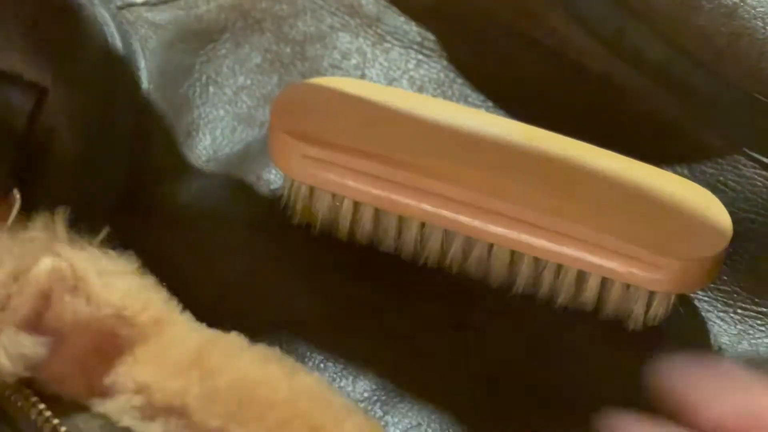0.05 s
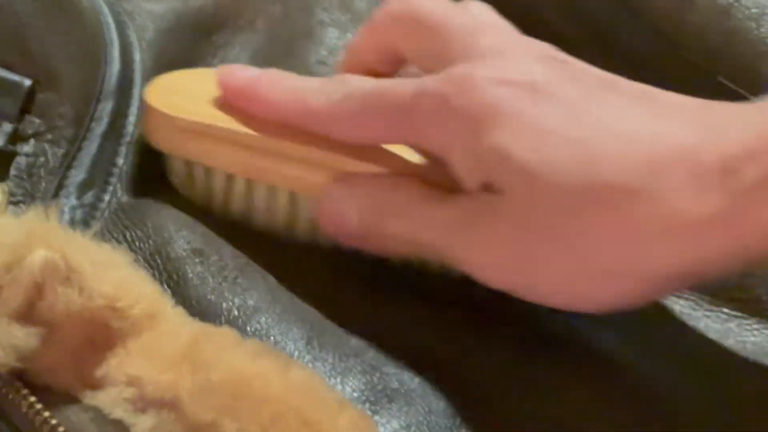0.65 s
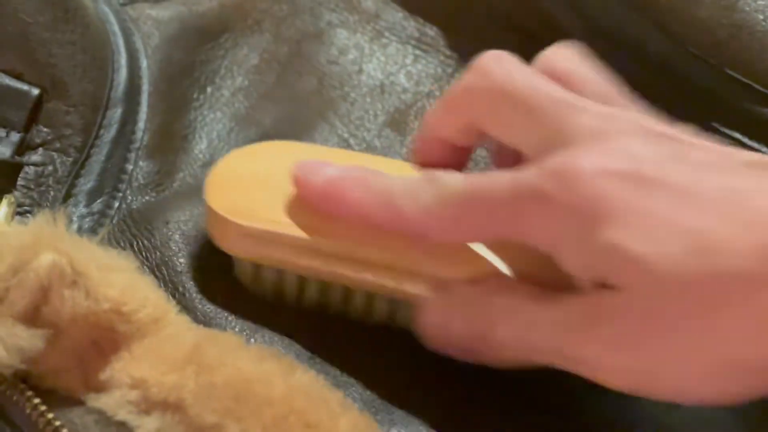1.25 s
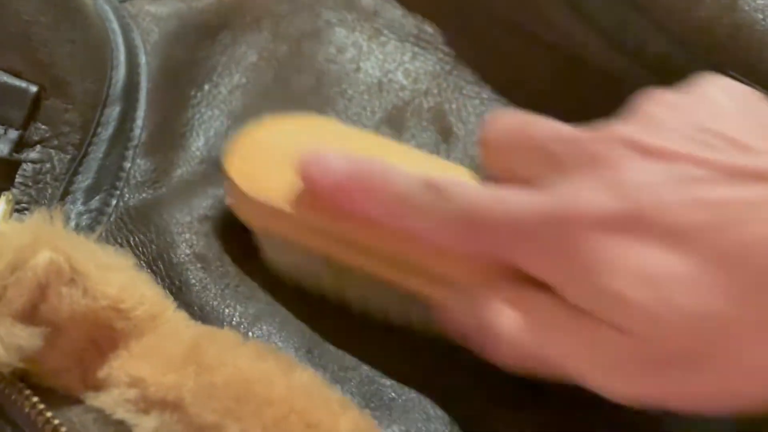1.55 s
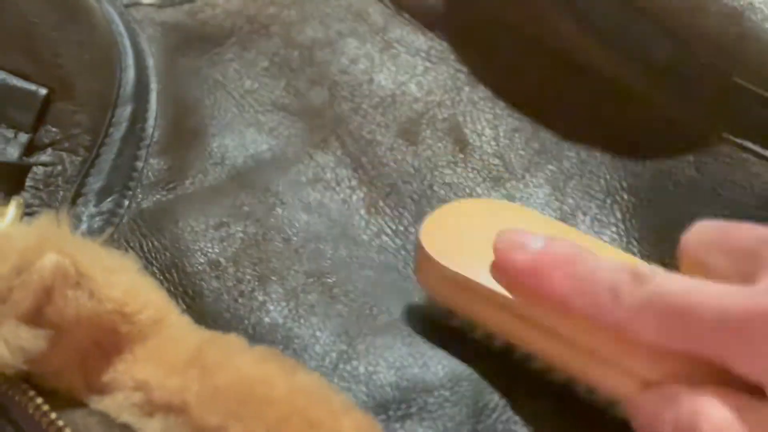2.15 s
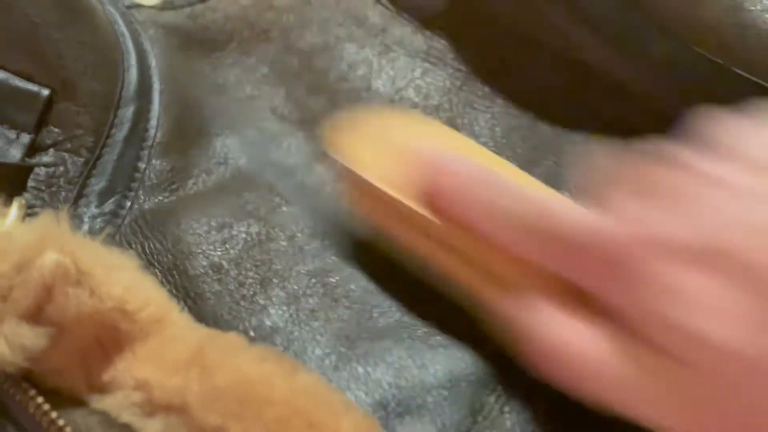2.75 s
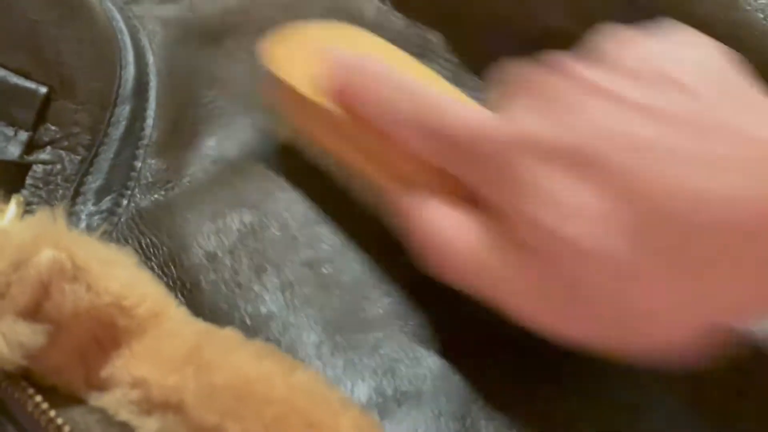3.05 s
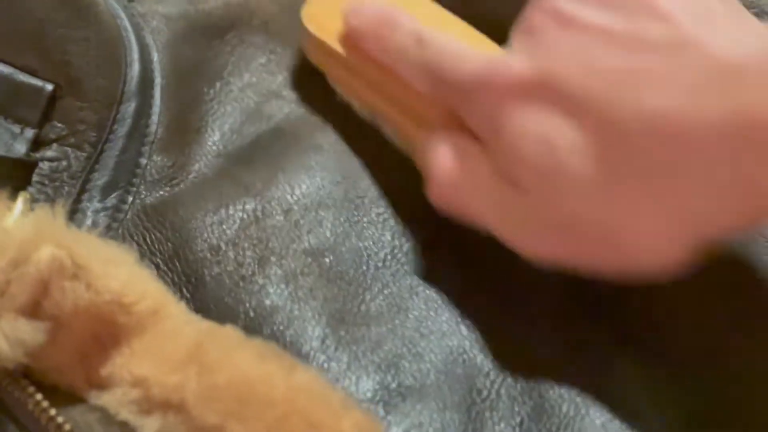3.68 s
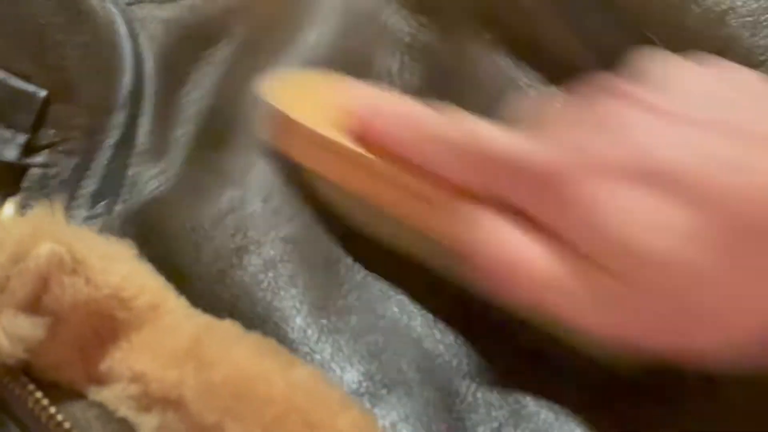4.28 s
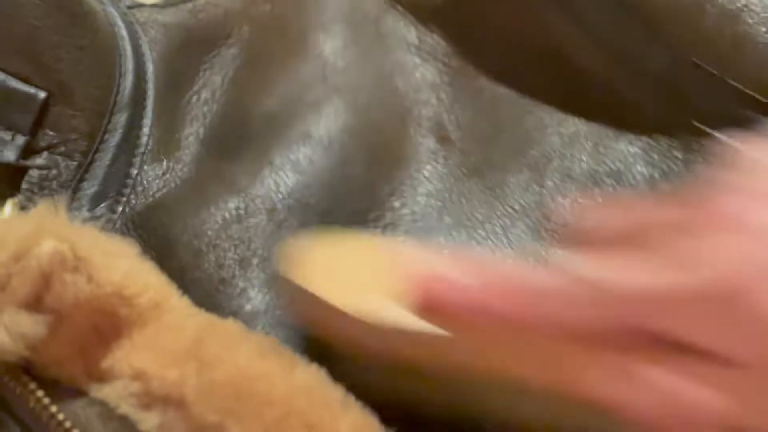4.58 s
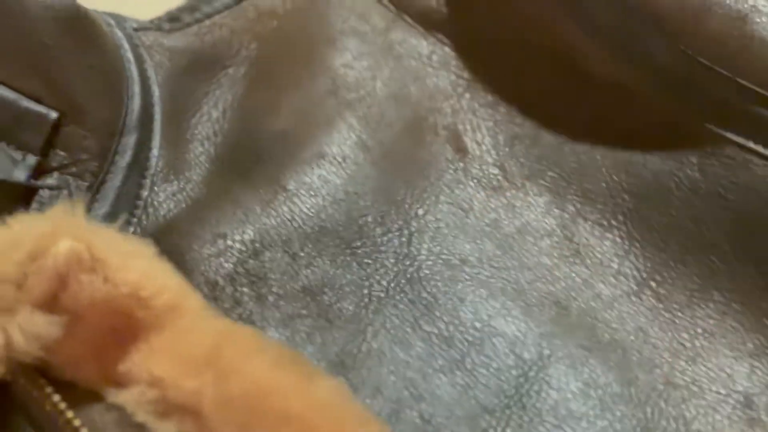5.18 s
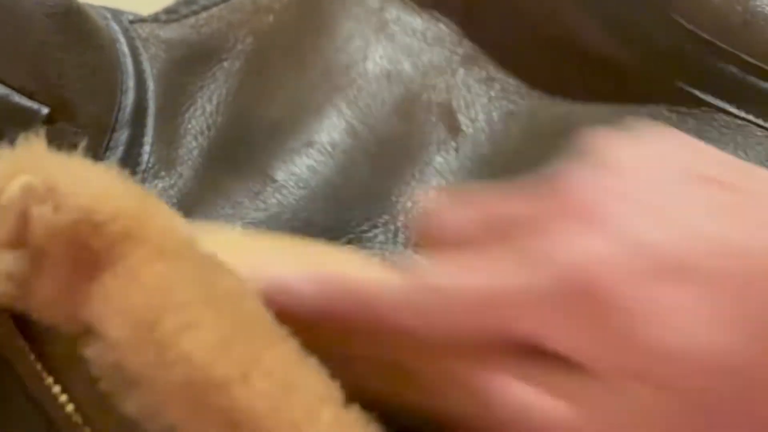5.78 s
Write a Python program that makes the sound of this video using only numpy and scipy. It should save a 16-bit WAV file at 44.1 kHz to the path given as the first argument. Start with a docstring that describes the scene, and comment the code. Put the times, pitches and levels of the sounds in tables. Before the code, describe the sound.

A wooden bristle brush scrubs a padded leather jacket, close to the microphone in a quiet room. After faint handling ticks come a few light, slower strokes, which soon grow louder and settle into a fast, even back and forth. Each stroke is a dry rasp with a fine hiss and a leathery rustle. In the first half the brush catches several times, making soft, low, stuttering thuds.

```python
"""Brushing a leather jacket

A wooden bristle brush scrubs to and fro, close by, in a quiet room. Each stroke speeds up and stops:
the leather rustles, its padding rumbles, the handle rings, the bristles rasp over the grain and
their tips hiss. In the first half the brush catches and judders, thudding on the padded jacket."""
import sys
import numpy as np
from scipy import signal
from scipy.fft import rfft, irfft, next_fast_len
from scipy.io import wavfile
from scipy.ndimage import uniform_filter1d, map_coordinates

SR = 44100
rng = np.random.default_rng(int(sys.argv[2]) if len(sys.argv) > 2 else 0)


def wrap_up_sound(samples):
    """Save the sound to the file named by the first command line argument, as 16-bit audio."""
    columns = np.atleast_2d(samples).T
    # keep every value between -1 and 1, then stretch to whole-number steps
    tamed = np.clip(columns, -1, 1)
    steps = np.round(tamed * 32767).astype(np.int16)
    wavfile.write(sys.argv[1], SR, steps)


N = 261513

# Noise spectra. Each row: frequency in Hz, relative spectral density in dB.
ROOM_SPECTRUM = [(20, -34), (31, -15), (44, 0), (75, -8), (130, -1.5), (300, -11.5), (1000, -30.5),
                 (3000, -40), (16000, -51)]
PADDING_SPECTRUM = [(25, -28), (50, -4.5), (100, -1.5), (132, 3), (165, -3.5), (215, 1), (320, -7),
                    (700, -38), (2000, -60)]
HANDLE_SPECTRUM = [(2800, -35), (3400, -17), (3630, 2), (3720, -3.5), (3950, -15), (4600, -49)]
LEATHER_SPECTRUM = [(20, -43), (90, -25), (150, -6), (250, 0.5), (380, -3), (540, -1), (700, -3), (820, -5),
                    (940, -5), (1300, -7), (2200, -18.5), (6000, -37)]
HISS_SPECTRUM = [(2000, -19.5), (5400, -13), (6350, -5.5), (7200, -8), (8500, -7.5), (10300, -10),
                 (11800, 1.8), (13200, -0.5), (14300, -4), (15800, -4.5)]
RASP_SPECTRUM = [(300, -33), (800, -11), (1400, 2), (2000, 1), (2800, 0), (3400, -3), (3950, -7),
                 (4400, -8.5), (5500, -12), (6400, -12), (9000, -13), (16000, -8)]
# Stereo width: how alike left and right sound. Each row: frequency in Hz, coherence.
STEREO_COHERENCE = [(60, 0.95), (150, 0.98), (400, .94), (650, 0.77), (1000, 0.83), (1800, 1), (2400, 1),
                    (2900, 1), (3600, 0.88), (4200, 1), (4700, 1), (7400, 1), (8300, 0.88), (9400, 1),
                    (10500, 1), (11200, 0.88), (13400, 1), (15000, 0.87)]
# Each row: frequency in Hz, left phase lead in radians.
STEREO_LEAD_RAD = [(400, 0), (700, .55), (1100, -.2), (2000, 0), (3600, .4), (4400, 0), (7400, 0),
                   (8700, -1.2), (9200, -3.1), (10600, -3.17), (11200, -4.2), (13300, -6.2), (14300, -6.7),
                   (15800, -8.5)]
# Each row: frequency in Hz, left minus right in dB.
STEREO_TILT_DB = [(150, 0), (330, -1), (520, -3), (690, 0), (870, 5), (1080, 0.8), (1250, -1.5), (1700, 0)]
# Hand and bristle ticks. Each row: start in seconds, level in dB, centre in Hz, width in Hz,
# T60 in seconds.
TICKS = [(.022, -61, 4470, 4000, 0.036), (0.081, -59, 800, 700, 0.026), (0.291, -69, 3650, 600, 0.037),
         (2.513, -41.5, 1500, 1499, .035), (2.876, -41, 1390, 1400, 0.044), (4.142, -38, 701, 600, 0.023),
         (5.779, -44, 900, 900, 0.051)]
# Runs of soft blows. Each row: start in seconds, relative level in dB, pitch in Hz,
# blow spacing in seconds, length in seconds.
JUDDERS = [(.378, -34.5, 127.6, 0.021, .12), (1.149, -33, 98, 0.035, .12), (1.359, -28, 133, 0.022, .12),
           (2.109, -27.5, 135, .0215, .12), (2.468, -27.5, 138, .021, .115), (2.699, -27, 102, .027, .07),
           (2.811, -36, 160, .013, .02)]
# Push and pull by turns. Each row: start in seconds, relative level at full speed in dB.
STROKES = [(0.071, -62.5), (0.217, -84), (0.312, -55), (0.401, -45), (0.643, -43.5), (0.913, -44),
           (1.187, -50.5), (1.455, -40.5), (1.679, -39), (1.847, -37), (2.011, -38), (2.174, -36.5),
           (2.324, -38), (2.493, -37.5), (2.67, -37.5), (2.859, -37.5), (3.028, -36.5), (3.204, -38.5),
           (3.367, -37), (3.534, -37.5), (3.695, -36.5), (3.862, -38), (4.023, -34.5), (4.192, -36),
           (4.365, -37), (4.54, -38), (4.701, -37), (4.883, -38), (5.062, -37.5), (5.234, -37),
           (5.414, -38.5), (5.576, -37.5), (5.758, -37)]
# Uneven grip. Each row: time in seconds, lean of the speed peak (+ early, - late).
GRIP_LEAN = [(.31, 0.28), (.4, -.75), (.65, 0.046), (.92, -.25), (1.2, -.9), (1.46, -.8), (1.7, -.2),
             (2.2, 0), (5.6, 0.13)]
# Spot under the brush. Each row: time in seconds, nasal resonance gain in dB, padding share in dB,
# leather tautness in dB (+ taut, - slack).
SPOT_COLOUR = [(.5, -4, -15, 3), (1.05, 1.5, -10, 2.5), (1.5, -5, -9.5, 1), (1.9, -5, -11.5, 2.5),
               (2.4, -1.5, -18.5, 1), (3.2, 0, -17, .5), (3.9, 2.5, -22, 1), (4.6, 2.5, -23.5, -0.5),
               (5.2, 1, -20.5, -2), (5.9, 0.5, -15, -0.5)]
# Bristle tips. Each row: time in seconds, hiss share in dB.
HISS_SHARE_DB = [(.3, -1.5), (.52, -9.5), (.78, -5.5), (1.35, -5.5), (1.57, -14), (1.76, -6.5), (2, -8.5),
                 (3.3, -8), (3.6, -12.5), (4.08, -11.5), (4.4, -6), (5.1, -2.5), (5.9, -3.2)]

STROKE_END_S, USUAL_STROKE_S, USUAL_LEVEL_DB = 5.973, .17, -38
TIME_S = np.arange(N) / SR


def amp(db):
    """Decibels to gain."""
    return 10 ** (np.asarray(db) / 20)


def unit(x):
    """Scale to rms 1."""
    return x / np.sqrt(np.mean(x ** 2) + 1e-20)


def along(points, hz):
    """Read (Hz, value) rows on a log axis."""
    knots_hz, values = np.transpose(points)
    return np.interp(np.log(hz + 1), np.log(knots_hz + 1), values)


def wobble(rate_hz):
    """Smooth random curve."""
    knots = rng.standard_normal(int(N * rate_hz / SR) + 4)
    return map_coordinates(knots, [TIME_S * rate_hz])


def filtered(x, response):
    """Apply a frequency response."""
    size = next_fast_len(N + SR // 4)
    return irfft(rfft(x, size) * response(np.fft.rfftfreq(size, 1 / SR)), size)[..., :N]


def resonance(hz, centre_hz, width_hz):
    """Response of one damped mode."""
    return 1j * hz * width_hz / (centre_hz ** 2 - hz ** 2 + 1j * hz * width_hz)


def boosted(x, db, centre_hz, width_hz):
    """Time-varying boost or cut of one resonance."""
    return x + (amp(db) - 1) * filtered(x, lambda hz: resonance(hz, centre_hz, width_hz))


def stereo(pair, spectrum):
    """Colour two independent signals and mix to left and right, rms 1."""
    size = next_fast_len(N + SR // 16)
    hz = np.fft.rfftfreq(size, 1 / SR)
    coherence = np.clip(along(STEREO_COHERENCE, hz), -1, 1)
    coloured = rfft(pair, size) * amp(along(spectrum, hz))
    common, apart = coloured * np.sqrt([1 + coherence, 1 - coherence])
    return unit(irfft([common + apart, common - apart], size)[:, :N])


def room(level_db=-59):
    """Steady low rumble."""
    return amp(level_db) * stereo(rng.standard_normal((2, N)), ROOM_SPECTRUM)


def walls(x, t60_s=0.11, wet_db=-17):
    """Faint diffuse reflections, different left and right."""
    t = np.arange(SR // 3) / SR
    tail = rng.standard_normal((2, len(t))) * amp(-60 * t / t60_s)
    return amp(wet_db) * signal.fftconvolve(x[None], tail / np.linalg.norm(tail[0]), axes=1)[:, :N]


def ticks(attack_s=0.0004):
    """Hand and catching bristles: short noise puffs, one resonance each."""
    out, t = np.zeros(N + SR), np.arange(SR // 10) / SR
    hz = np.fft.rfftfreq(len(t), 1 / SR)
    for start_s, db, centre_hz, width_hz, t60_s in TICKS:
        spectrum = rfft(rng.standard_normal(len(t))) * resonance(hz, centre_hz, width_hz) ** 2
        envelope = amp(db - 60 * t / t60_s) * (1 - np.exp(-t / attack_s))
        out[round(start_s * SR):][:len(t)] += unit(irfft(spectrum, len(t))) * envelope
    return out[:N]


def judder_blows(touch_db=-3, touch_ratio=1.35, fade_db_per_s=89):
    """The brush catches: a light, higher touch, then uneven fading bounces. Yields (s, dB, Hz)."""
    for start_s, db, hz, gap_s, length_s in JUDDERS:
        yield start_s, db + touch_db, hz * touch_ratio
        scatter = rng.standard_normal((8, 3)) * [.0012, 1.2, 0.067]
        for delay_s, (late_s, louder_db, detune) in zip(np.arange(gap_s, length_s, gap_s), scatter):
            fade_db = fade_db_per_s * (delay_s - gap_s)
            yield start_s + delay_s + late_s, db - fade_db + louder_db, hz * (1 + detune)


def support(hz, boom_db=1, cutoff_hz=30):
    """Response of the surface under the jacket: it booms; the deepest bass does not radiate."""
    boom = amp(boom_db) * resonance(hz, centre_hz=131, width_hz=12)
    return (1 + boom) * (1j * hz / (1j * hz + cutoff_hz)) ** 2


def thuds(t60_s=0.053, attack_s=0.0031, gain_db=5.7, skin_db=-4, skin_ratio=1.72, skin_t60_s=0.036):
    """Each blow bounces the padded jacket for a few cycles; its skin adds a shorter overtone."""
    out, t = np.zeros(N + SR), np.arange(SR // 4) / SR
    onset = 1 - np.exp(-t / attack_s)
    for start_s, db, hz in judder_blows():
        bounce = amp(-60 * t / t60_s) * np.sin(2 * np.pi * hz * t)
        skin = amp(skin_db - 60 * t / skin_t60_s) * np.sin(2 * np.pi * skin_ratio * hz * t)
        out[round(start_s * SR):][:len(t)] += amp(db + gain_db) * onset * (bounce + skin)
    return filtered(out[:N], support)


def stroke_columns():
    """Per stroke: start, length, level, direction (0 push, 1 pull)."""
    start_s, full_db = np.transpose(STROKES)
    length_s = np.diff(np.append(start_s, STROKE_END_S))
    return start_s, length_s, full_db, np.arange(len(start_s)) % 2


def hand_swing(swing_lean=.29, rhythm_from_s=1.6, settle_s=.7):
    """Pendulum motion, half a swing per stroke. Returns speed (0-1) and stroke index per sample."""
    start_s, _, _, pull = stroke_columns()
    progress = np.interp(TIME_S, np.append(start_s, STROKE_END_S), np.arange(len(start_s) + 1))
    stroke, part = np.minimum(progress.astype(int), len(start_s) - 1), progress % 1
    # In rhythm, pushes peak late and pulls early.
    rhythm = np.clip((start_s - rhythm_from_s) / settle_s, 0, 1)
    lean = np.interp(start_s, *np.transpose(GRIP_LEAN)) + swing_lean * rhythm * (2 * pull - 1)
    skewed = part + np.clip(lean, -1, 1)[stroke] * part * (1 - part)
    return np.abs(np.sin(np.pi * skewed)), stroke


def friction(speed, stroke, grip_speed=.28, push_turn_db=-15.2, pull_turn_db=-12.3, slow_db_per_s=-22):
    """Friction gain: bristles slide under way, levelling off at speed; at turns they bend and scrape."""
    start_s, length_s, full_db, pull = stroke_columns()
    release = 1 - np.exp(-(speed / grip_speed) ** 2)
    sliding = amp(full_db[stroke]) * np.tanh(1.26 * speed ** 1.3) * release
    # Turns follow the adjacent strokes; slow strokes dip further.
    scrape_db = full_db + slow_db_per_s * (length_s - USUAL_STROKE_S)
    turn_db = np.interp(start_s, start_s + length_s / 2, scrape_db)
    turn_db += np.where(pull, pull_turn_db, push_turn_db)
    bending = amp(np.interp(TIME_S, start_s, turn_db))
    return np.hypot(sliding, bending)


def bristle_slips(rate_hz, spread_db):
    """Random impulses of bristles slipping free, at constant mean power."""
    count = rng.poisson(rate_hz / SR, (2, N))
    strength = amp(spread_db * rng.standard_normal((2, N))) * rng.standard_normal((2, N))
    return unit(strength * np.sqrt(count / rate_hz))


def folds(x, depth_db, frame_samples=1024):
    """Narrow resonances come and go as the brush crosses folds."""
    frames = signal.stft(x, nperseg=frame_samples)[2]
    patches = uniform_filter1d(rng.standard_normal(frames.shape[1:]), size=2, axis=0)
    patches = uniform_filter1d(patches, size=SR // 4 // frame_samples, axis=1)
    return signal.istft(frames * amp(depth_db * unit(patches)), nperseg=frame_samples)[1][:, :N]


def padding_rumble(share_db, haste):
    """Low noise of the padding under the leather."""
    return stereo(rng.standard_normal((2, N)), PADDING_SPECTRUM) * amp(share_db - 2.5 * haste)


def handle_ring(slips):
    """Slips drive a narrow resonance of the wooden handle."""
    return stereo(slips, HANDLE_SPECTRUM) * amp(-19 + 1.1 * wobble(8))


def leather_rustle(slips, taut_db, haste, usual_share_db=-4.5, loss_db_per_db=0.33, slow_db_per_s=10):
    """Slips stir the leather, high where taut, low where slack; light, slow strokes favour it."""
    start_s, length_s, full_db, _ = stroke_columns()
    stroke_share_db = usual_share_db - loss_db_per_db * (full_db - USUAL_LEVEL_DB)
    stroke_share_db += slow_db_per_s * (length_s - USUAL_STROKE_S)
    share_db = np.interp(TIME_S, start_s + length_s / 2, stroke_share_db)
    rustle = stereo(folds(slips, depth_db=2), LEATHER_SPECTRUM)
    rustle *= amp(share_db - 0.82 * haste + 0.45 * wobble(35))
    rustle = boosted(rustle, taut_db, centre_hz=850, width_hz=240)
    return boosted(rustle, -taut_db, centre_hz=477, width_hz=120)


def tip_hiss(rate_hz, haste):
    """Fine tips slip three times as often; their share rises with speed."""
    slips = bristle_slips(3 * rate_hz, spread_db=0.5)
    hiss = stereo(folds(slips, depth_db=1.5, frame_samples=512), HISS_SPECTRUM)
    share_db = np.interp(TIME_S, *np.transpose(HISS_SHARE_DB))
    return hiss * amp(share_db + 1.87 + 5.8 * haste + 0.29 * wobble(28))


def bristle_rasp(rate_hz, nasal_db, haste):
    """Bristles rasp over the grain, coloured by the spot they cross."""
    slips = bristle_slips(rate_hz, spread_db=0)
    rasp = stereo(folds(slips, depth_db=2.5), RASP_SPECTRUM)
    rasp = boosted(rasp, nasal_db, centre_hz=1950, width_hz=480)
    return rasp * amp(-4.5 - .4 * haste + 0.51 * wobble(25))


def brushing():
    """Friction scales five layers; faster bristles slip more often and sound brighter."""
    speed, stroke = hand_swing()
    spot_s, *columns = np.transpose(SPOT_COLOUR)
    nasal_db, padding_db, taut_db = [np.interp(TIME_S, spot_s, column) for column in columns]
    rate_hz = 3000 + 22000 * speed
    haste = speed - .8
    coarse_slips = bristle_slips(rate_hz, spread_db=1.93)
    jacket = leather_rustle(coarse_slips, taut_db, haste) + padding_rumble(padding_db, haste)
    brush = handle_ring(coarse_slips) + bristle_rasp(rate_hz, nasal_db, haste) + tip_hiss(rate_hz, haste)
    return friction(speed, stroke) * amp(0.26 * wobble(41)) * (jacket + brush)


def scene():
    """Brushing, thuds and ticks over room rumble."""
    knocks = thuds() + ticks()
    return brushing() + knocks + walls(knocks) + room()


def record(dry):
    """Level and phase offsets between left and right, then a hard band limit."""
    half, top_hz = np.array([[.5], [-.5]]), 15780

    def response(hz):
        gain = amp(half * along(STEREO_TILT_DB, hz))
        phase_rad = half * along(STEREO_LEAD_RAD, hz)
        return gain * np.exp(1j * phase_rad) * (hz < top_hz)
    return filtered(dry, response)


dry = scene()
out = record(dry)
wrap_up_sound(out)
```